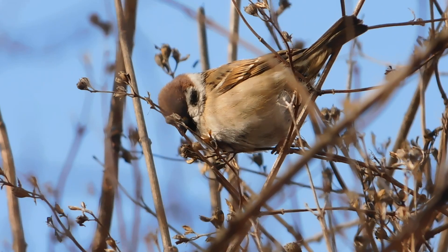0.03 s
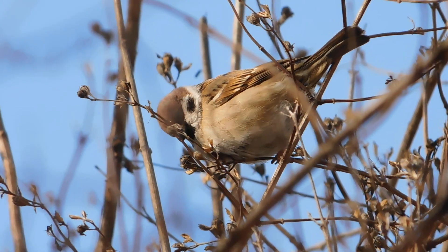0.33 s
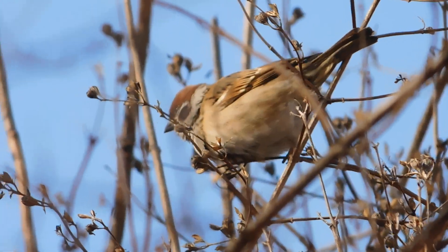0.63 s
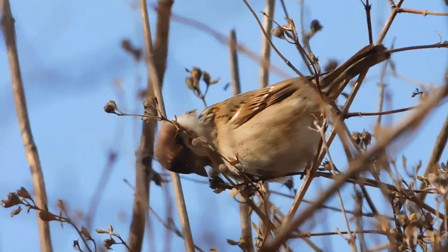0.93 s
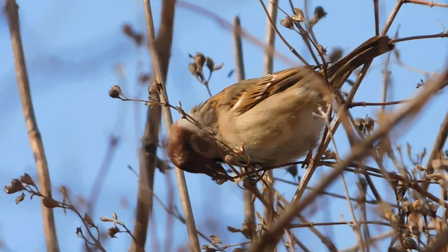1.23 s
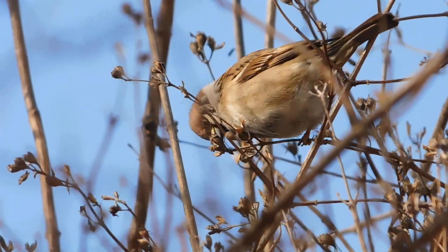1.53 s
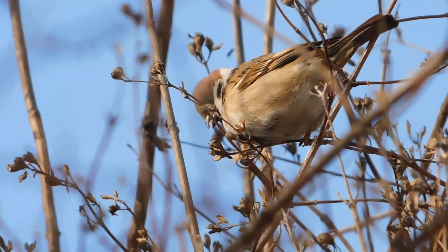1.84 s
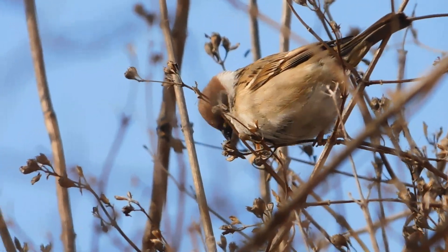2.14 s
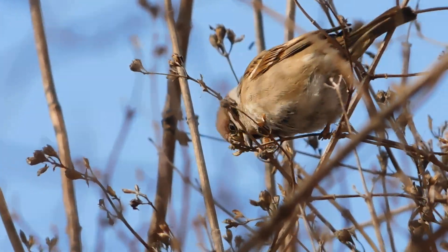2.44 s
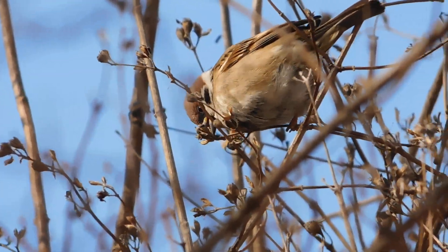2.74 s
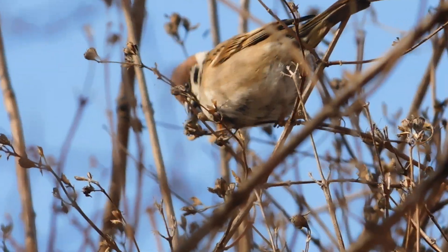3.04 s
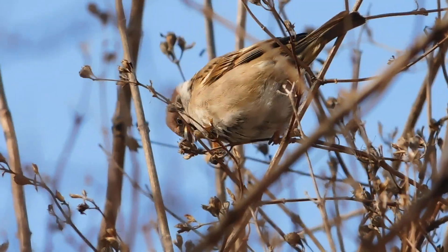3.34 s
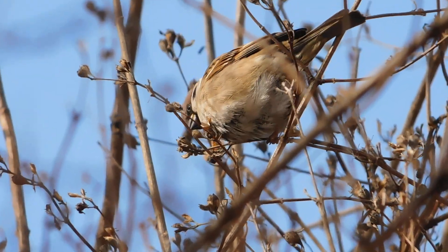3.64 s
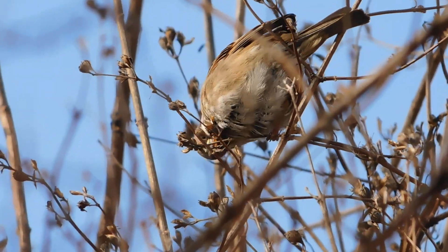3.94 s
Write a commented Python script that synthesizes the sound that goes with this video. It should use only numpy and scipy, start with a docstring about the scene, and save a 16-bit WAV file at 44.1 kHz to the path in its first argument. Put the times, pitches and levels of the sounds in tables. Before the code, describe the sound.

Dry, woody clicks and snaps from a bird pecking at twigs start at about 0.7 seconds and continue unevenly until 4, each with a short outdoor echo, pausing briefly around 2 seconds. Twigs crackle from about 0.9 to 1.5 seconds and again around 3. Sparrows chirp in short, high notes throughout, slightly to the right. Distant traffic murmurs underneath with a low engine drone, swelling a little near the end.

```python
"""Winter knocks and sparrows

Dry knocks, snaps and crackles come at uneven intervals and echo outdoors.
Each knock is a burst of noise with a woody ring.
A flock of sparrows chirps in short notes that arch up and down in pitch.
Distant traffic murmurs underneath, with a low engine drone."""
import sys
import numpy as np
from scipy import signal
from scipy.fft import rfft, irfft, next_fast_len
from scipy.io import wavfile
from scipy.ndimage import map_coordinates

SR = 44100
rng = np.random.default_rng(int(sys.argv[2]) if len(sys.argv) > 2 else 0)


def inscribe(sig):
    """Save sig as 16-bit PCM at rate SR to the path in sys.argv[1].

    A 1-D sig is mono; a 2-D sig holds one channel per row.
    Samples are clipped to [-1, 1] before scaling.
    """
    pcm = np.round(np.clip(np.atleast_2d(sig).T, -1, 1) * 32767)
    wavfile.write(sys.argv[1], SR, pcm.astype(np.int16))


N = 176400

# Sound scattered by the surroundings. Each row: frequency in Hz, how alike left and right are (1 = same).
ECHO_LIKENESS = [(100, .99), (600, 1), (1400, 0.76), (3000, 0.33), (10000, 0.073)]
ECHO_LEAD_S = .00008  # it reaches the left side first
FLOCK_PITCH_HZ = 3534


def amp(db):
    """Turn a level in dB into a number to multiply by."""
    return 10 ** (np.asarray(db) / 20)


def unit(x):
    """Scale x to an average (rms) strength of 1."""
    return x / np.sqrt(np.mean(x ** 2) + 1e-20)


def along(points, hz):
    """Read between (Hz, value) points, spaced by octaves."""
    freqs, values = np.transpose(points)
    return np.interp(np.log(hz + 1), np.log(freqs + 1), values)


def wobble(rate, size=N):
    """A smooth curve through rate random values a second."""
    values = rng.standard_normal(size // 8 + 8)
    return map_coordinates(values, [np.arange(size) * rate / SR], mode="wrap")


def filtered(x, response):
    """Scale and shift each frequency in x by response(Hz)."""
    n = x.shape[-1]
    padded = next_fast_len(n + 8192)
    return irfft(rfft(x, padded) * response(np.fft.rfftfreq(padded, 1 / SR)), padded)[..., :n]


def ringing(gain_db, size):
    """How a filter with the levels gain_db(Hz) rings after a single click."""
    cepstrum = irfft(np.log(amp(gain_db(np.fft.rfftfreq(size, 1 / SR))) + 1e-6))
    cepstrum[1:size // 2] *= 2  # fold forward, so nothing sounds before the click
    cepstrum[size // 2 + 1:] = 0
    return irfft(np.exp(rfft(cepstrum)))


def left_first(x, lead_s):
    """Stereo x with the left side ahead by lead_s (negative: the right side)."""
    return filtered(x, lambda hz: np.exp(1j * np.pi * hz * lead_s * np.array([[1], [-1]])))


def stereo_noise(likeness, size=N):
    """White noise whose two sides are as alike as the table says."""
    angle = lambda hz: np.arccos(np.clip(along(likeness, hz), -1, 1)) / 2
    shares = lambda hz: np.array([np.cos(angle(hz)), np.sin(angle(hz))])
    mid, side = filtered(rng.standard_normal((2, size)), shares)
    return np.array([mid + side, mid - side])


def add(out, start_s, x):
    """Mix x into out at start_s."""
    part = out[:, max(round(start_s * SR), 0):][:, :x.shape[-1]]
    part += x[:, :part.shape[1]]


def murmur(colour, levels, sway_db):
    """Distant road noise that sways a little around its level."""
    # Each row: frequency in Hz, how alike left and right are.
    likeness = [(60, 0.98), (290, 0.94), (640, 0.86), (1400, 0.48), (3100, -0.2), (15000, -0.062)]
    noise = unit(filtered(stereo_noise(likeness), lambda hz: amp(along(colour, hz))))
    level_db = np.interp(np.arange(N) / SR, *np.transpose(levels))
    return noise * amp(level_db + sway_db * wobble(8.204))


def traffic():
    """Far roads murmur, one car's tyres draw nearer and an engine drones unsteadily."""
    # The tone of roads and tyres. Each row: frequency in Hz, relative level in dB.
    road_colour = [(15, -28), (25, 2.5), (55, -2), (113, -11), (215, -11), (378, -11.5), (482, -8),
                   (762, -8.5), (945, -5.5), (2120, -10.5), (2900, -14), (4040, -13), (5010, -20),
                   (7000, -23), (11000, -31), (15500, -37)]
    tyre_colour = [(100, -30), (450, -13.5), (800, -2.5), (1050, 2), (1500, -4), (3000, -29.5),
                   (15000, -50)]
    # How loud they are over time. Each row: time in seconds, level in dB.
    road_levels = [(0, -47.5), (.6, -49.5), (1.1, -49), (2, -50), (2.5, -49), (3.1, -48), (3.5, -47),
                   (4, -44)]
    tyre_levels = [(0, -83.5), (2, -51.5), (2.8, -51), (3.4, -47), (4, -49)]
    drone_hz = 46.6 + 2.82 * wobble(11)
    drone = unit(np.sin(2 * np.pi * np.cumsum(drone_hz) / SR) * amp(-1.5 * wobble(8)))
    roads = murmur(road_colour, road_levels, sway_db=1.8)
    tyres = murmur(tyre_colour, tyre_levels, sway_db=1.5)
    return roads + tyres + amp(-61.5) * drone


def chatter(count):
    """Rows of faint, random chirps for the rest of the flock, laid out as in sparrows()."""
    rows = []
    for k in range(count):
        when, rise, fall, buzz = rng.random(4)
        pitch, loudness, stretch = rng.standard_normal(3)
        start_s, length_s = (k + when) / count * N / SR, .04 * 1.25 ** stretch
        top_hz = FLOCK_PITCH_HZ * 2 ** (.3 * pitch)
        first_hz, last_hz = top_hz * (1 - .25 * rise), top_hz * (1 - .25 * (fall + .5))
        rows.append((start_s, length_s, first_hz, top_hz, last_hz, -56.5 + 3.5 * loudness, .4 + buzz))
    return rows


def chirp(t, length_s, first_hz, top_hz, last_hz, level_db, buzz):
    """One note arches up to its top pitch and falls; a fast shake in pitch makes it buzz."""
    arch_power, edge_s, db_per_octave = 1.3, .0027, -4.5  # higher notes arrive weaker
    progress = np.clip(t / length_s, 0, 1)
    rise = abs(top_hz - first_hz) ** (1 / arch_power)  # a first pitch above the top flips below it
    fall = abs(top_hz - last_hz) ** (1 / arch_power)
    hz = top_hz - np.abs(progress * (rise + fall) - rise) ** arch_power
    shake = 1 + .1263 * buzz * wobble(1300, size=t.size)
    phase = 2 * np.pi * np.cumsum(hz * shake) / SR
    tone = np.sin(phase) + amp(-33) * np.sin(2 * phase)
    fade = np.clip(np.minimum(t, length_s - t) / edge_s, 0, 1)
    flutter = unit(amp(2.5 * wobble(170, size=t.size)))
    gain = amp(level_db + 1 + db_per_octave * np.log2(hz / FLOCK_PITCH_HZ))
    return gain * fade * flutter * tone


def sparrows():
    """The flock chirps off to the right; each note has a short echo and one reflection."""
    # The clearer chirps. Each row: start and length in seconds, first, top and last pitch in Hz,
    # relative level in dB, buzz from 0 to 1.
    chirps = [ (.086, 0.032, 3160, 4000, 3190, -38.5, 0.63), (.10, 0.065, 4500, 5100, 4340, -44, .6),
              (.08, 0.073, 6000, 6640, 6140, -54, .8), (0.138, 0.052, 3530, 3630, 3450, -43.5, 0.27),
              (0.171, 0.04, 2880, 3330, 2250, -46, 0.8), (0.257, .07, 3970, 4890, 3770, -47, .1),
              (0.306, .05, 5470, 5500, 5070, -52, 0), (.345, 0.067, 3270, 3910, 2850, -42.5, 0.62),
              (0.401, 0.068, 2890, 3537, 3320, -46, 0.17), (.47, .04, 3030, 3570, 3220, -43, 0.5),
              (.485, 0.055, 4660, 5300, 5140, -43, .4), (.47, 0.055, 6200, 7030, 6640, -54, .8),
              (.59, 0.045, 6200, 6900, 5570, -57, 0.8), (.63, .04, 5300, 5320, 5200, -51, .1),
              (0.508, .05, 5800, 6240, 6100, -55, 0.5), (0.534, 0.062, 4410, 4750, 3550, -44.5, 0.41),
              (0.531, 0.041, 3435, 3450, 2830, -44, 0.4), (0.592, 0.042, 4640, 5460, 3610, -41.5, 0.97),
              (0.602, 0.03, 3970, 4160, 2870, -39.5, 0.74), (0.783, 0.053, 4200, 4930, 3740, -42.5, .3),
              (.843, 0.065, 3640, 4030, 3190, -41, 1), (.96, 0.031, 7630, 7980, 7720, -58, 0.14),
              (1.048, .03, 4420, 4570, 3960, -51, 0.8), (1.075, 0.022, 3390, 3540, 2900, -45, .4),
              (1.117, 0.041, 5600, 6600, 5960, -46, 0), (1.244, 0.034, 3820, 4400, 3850, -42, .2),
              (1.307, 0.058, 3600, 4400, 3380, -40.5, 0.47), (1.371, 0.047, 3780, 4000, 2735, -40.5, 0.84),
              (1.43, .04, 2940, 3110, 3130, -49, 0), (1.507, 0.04, 3000, 3100, 2090, -49.5, 0.5),
              (1.575, 0.031, 5700, 6270, 5600, -54, 0), (1.73, 0.051, 5870, 5650, 5420, -53, 0.02),
              (1.796, 0.046, 5720, 6420, 6040, -51, .3), (1.807, 0.038, 4890, 5170, 3750, -43, 0.66),
              (1.87, 0.093, 6290, 6220, 5680, -53, 0.32), (1.89, .025, 3700, 4700, 4520, -64, 0.4),
              (1.945, .025, 3400, 4900, 4800, -57, .2), (2.035, 0.03, 3860, 4300, 3520, -43, 0.8),
              (2.06, 0.036, 3475, 3520, 2830, -46.5, 0.8), (2.12, 0.089, 3600, 5380, 3570, -47, 0.62),
              (2.262, 0.032, 4020, 4360, 3310, -37, 0.95), (2.29, 0.0358, 3460, 3515, 3070, -40.5, 1),
              (2.259, 0.047, 6000, 6300, 5820, -44.5, 0.6), (2.333, 0.055, 3870, 5080, 3850, -43.5, 0.17),
              (2.343, 0.049, 3550, 3760, 2250, -50.5, 0.43), (2.409, 0.035, 3270, 3890, 3620, -41.5, 0.56),
              (2.45, 0.0269, 3230, 3265, 2680, -40, 0.76), (2.495, 0.032, 4800, 5560, 4570, -52, 0.5),
              (2.516, 0.037, 3380, 4150, 3950, -46, 0.12), (2.612, 0.02, 4360, 4550, 4420, -44, 0.15),
              (2.731, 0.04, 4300, 5080, 4880, -47, 0.46), (2.768, 0.046, 4350, 4380, 3300, -51, 0.2),
              (2.757, 0.022, 2760, 2634, 2470, -46, 0.54), (2.831, 0.049, 3370, 3960, 2825, -39.5, 0.3),
              (2.908, 0.046, 3270, 3740, 3400, -61.5, 0.6), (2.946, 0.074, 5720, 5900, 5280, -50, .2),
              (3.139, 0.046, 6640, 6640, 6370, -50.5, 0.02), (3.195, 0.055, 6060, 5900, 5660, -56, 0.13),
              (3.384, 0.041, 5580, 6180, 5670, -51.5, 0.2), (3.415, 0.039, 3860, 4300, 4000, -40, 0.9),
              (3.475, 0.056, 3610, 4080, 3534, -42, 0.61), (3.485, .03, 4700, 5100, 4900, -53, .2),
              (3.535, 0.028, 2960, 3510, 3500, -46, 0.5), (3.72, 0.044, 5600, 5900, 5500, -54, 0.2),
              (3.798, .06, 4820, 5420, 3900, -53, 0.5), (3.894, 0.079, 3800, 4770, 3750, -45, .4),
              (3.986, .04, 3760, 4000, 3500, -41, 0.5)]
    echo_s, reflection_s = .13, .014  # time to fade by 60 dB; average delay
    out, t = np.zeros((2, N)), np.arange(SR // 4) / SR
    for start_s, *shape in list(chirps) + chatter(count=150):
        note = chirp(t, *shape)
        scatter = rng.standard_normal((2, t.size)) * amp(-60 * t / echo_s)
        echo = signal.fftconvolve(note[None], scatter / np.linalg.norm(scatter[0]), axes=1)
        direct = left_first(note, lead_s=-.00012 + .000012 * rng.standard_normal())
        add(out, start_s, direct)
        add(out, start_s, amp(1.5) * echo)
        add(out, start_s + reflection_s * (.5 + rng.random()), amp(-12) * direct[::-1])  # sides swap
    return out


def woody_ring(body_db, upper_db, crack_db):
    """Every knock rings at the same woody pitches, in a slightly different mix."""
    # The broad tone of a knock. Each row: frequency in Hz, relative level in dB.
    colour = [(60, -21), (200, -9.5), (340, -2), (480, 4), (600, 8), (780, 6.5), (1000, 10), (1300, 9.5),
              (1800, 9.5), (2600, 3), (4300, 13), (6500, 4), (11000, -2), (15500, -4.5)]
    # Where a knock rings. Each row: pitch in Hz, width in Hz, boost (or cut) in dB.
    resonances = [(448, 10, 5), (586, 21, 6.5), (700, 46, 5), (971, 31, 7), (1390, 29, 3.5),
                  (1734, 81, 2.5), (2332, 40, 7.5), (2550, 47, 14), (3340, 43, -1), (4300, 70, -10)]
    balance = [(794, body_db), (1940, upper_db), (8500, crack_db)]
    ripple_db, ripple_step_hz = 2.5, 70.4
    bumps = rng.standard_normal(1024)
    peaks = lambda hz: sum(db / (1 + (2 * (hz - pitch) / width) ** 2) for pitch, width, db in resonances)
    ripple = lambda hz: ripple_db * map_coordinates(bumps, [hz / ripple_step_hz], mode="wrap")
    return ringing(lambda hz: along(colour, hz) + along(balance, hz) + peaks(hz) + ripple(hz), size=8192)


def echo_tail(t, rise_s):
    """The late echo of a knock swells quickly, then loses its high sounds first."""
    # Each row: frequency in Hz, seconds to fade by 60 dB.
    fade_times = [(200, 1), (550, 0.86), (1400, 0.59), (3500, 0.33), (10000, 0.14)]
    # The tone of the echo. Each row: frequency in Hz, relative level in dB.
    colour = [(300, 5), (1500, 3), (4000, -1), (10000, -23)]
    hz, age, bands = signal.stft(stereo_noise(ECHO_LIKENESS, size=t.size), SR, nperseg=256)
    level_db = along(colour, hz)[:, None] - 3.5 - 60 * age / along(fade_times, hz)[:, None]
    tail = signal.istft(bands * amp(level_db), SR, nperseg=256)[1][:, :t.size]
    return tail * (1 - np.exp(-t / rise_s))


def knocks():
    """Each knock is a snap with a sharp tick, nearby reflections and a tail, all ringing like wood."""
    # Each row: start in seconds, then relative levels in dB of the low body, upper body and crack.
    strikes = [(.61, -62, -39, -61), (.714, -34, -39.5, -48.5), (.734, -40.5, -53, -66),
               (.754, -40.5, -38, -49), (.902, -41, -39.5, -52.5), (1.139, -33.5, -37.5, -45.5),
               (1.174, -44.5, -39, -60), (1.301, -37, -41, -55), (1.363, -35, -39, -50),
               (1.427, -46.5, -49.5, -67), (1.61, -35, -35, -56.5), (1.68, -41, -46, -50.5),
               (1.699, -38, -38.5, -45.5), (1.719, -36.5, -52.5, -61), (2.212, -39.5, -41, -50),
               (2.224, -39, -46.5, -54), (2.434, -37.5, -43.5, -51.5), (2.56, -37, -38.5, -52),
               (2.612, -35, -38, -48.5), (2.792, -36, -34, -55.5), (2.874, -39, -35, -48),
               (2.952, -35, -39, -49), (2.975, -49, -38, -51), (3.037, -50, -54, -59),
               (3.182, -36.5, -44, -52.5), (3.236, -35.5, -39, -47), (3.647, -56, -45, -53),
               (3.698, -40, -48, -69), (3.756, -37, -44.5, -50.5), (3.817, -46, -58, -67.5),
               (3.906, -37.5, -42.5, -49.5)]
    snap_s, tick_s, reflections_s = .036, .016, .2  # times to fade by 60 dB
    out, t = np.zeros((2, N)), np.arange(SR) / SR
    for start_s, body_db, upper_db, crack_db in strikes:
        snap = rng.standard_normal(SR) * amp(2 - 60 * t / snap_s)
        treble = filtered(rng.standard_normal(SR), lambda hz: hz ** 2 / (hz ** 2 + 5000 ** 2))
        tick = treble * amp(5 - 60 * t / tick_s)
        reflections = stereo_noise(ECHO_LIKENESS, size=SR) * amp(.5 - 60 * t / reflections_s)
        direct = left_first(snap + tick, lead_s=.000092)
        echo = left_first(reflections + echo_tail(t, rise_s=.014), ECHO_LEAD_S)
        ring = woody_ring(body_db, upper_db, crack_db)
        add(out, start_s, signal.fftconvolve(direct + echo, ring[None], axes=1))
    return out * amp([[-1], [1]])  # louder on the right


def twig_crackle():
    """Dry twigs crackle in short stretches of spiky noise that swell and die away."""
    # Each row: start in seconds, length in seconds, relative level in dB.
    stretches = [(0.913, 0.1, 17), (1.157, 0.092, 17.5), (1.32, 0.15, 13.5), (2.567, 0.08, 14.5),
                 (2.817, 0.39, 14.5), (3.215, 0.046, 16), (3.636, 0.056, 12)]
    # The tone of the twigs. Each row: frequency in Hz, relative level in dB.
    colour = [(300, -25), (1000, -1), (2000, 10.5), (3500, 3.5), (7000, -14), (15000, -27)]
    t, swell = np.arange(N) / SR, np.zeros(N)
    for start_s, length_s, db in stretches:
        progress = np.clip((t - start_s) / length_s, 0, 1)
        swell += amp(db) * np.sqrt(np.abs(np.sin(np.pi * progress)))
    spikes = stereo_noise(ECHO_LIKENESS) * amp(2.5 * wobble(500))
    crackle = unit(filtered(spikes, lambda hz: amp(along(colour, hz))))
    return amp(-59) * swell * left_first(crackle, ECHO_LEAD_S)


def scene():
    """All the sounds together, with the right side turned up a little."""
    return (knocks() + twig_crackle() + sparrows() + traffic()) * amp([[-.32], [.32]])


def record(dry):
    """The sound fades in quickly and its very highest treble is cut off."""
    fade_middle_s, fade_s, top_hz = .043, .015, 15850
    fade_in = np.clip((np.arange(N) / SR - fade_middle_s) / fade_s + .5, 0, 1)
    return filtered(dry * fade_in, lambda hz: hz < top_hz)


dry = scene()
out = record(dry)
inscribe(out)
```